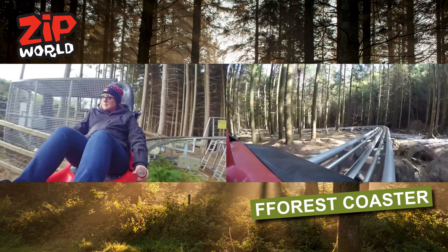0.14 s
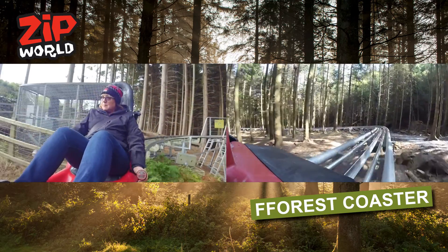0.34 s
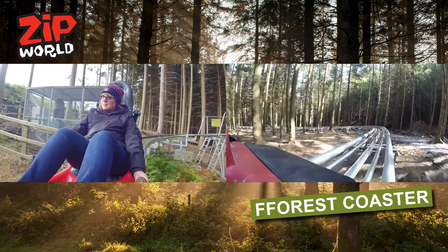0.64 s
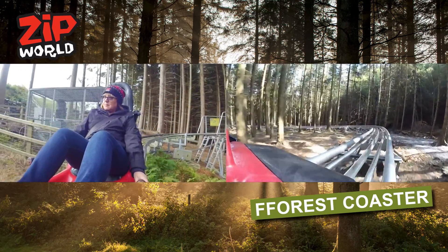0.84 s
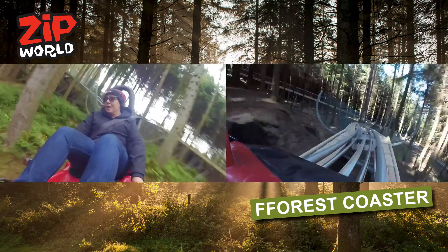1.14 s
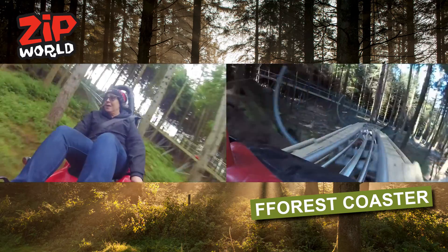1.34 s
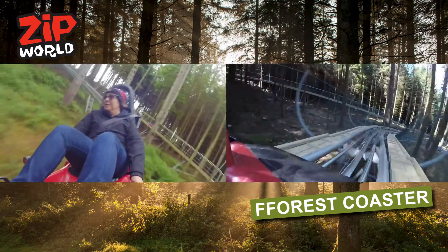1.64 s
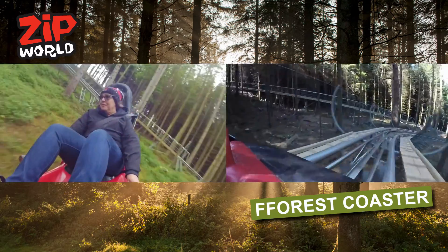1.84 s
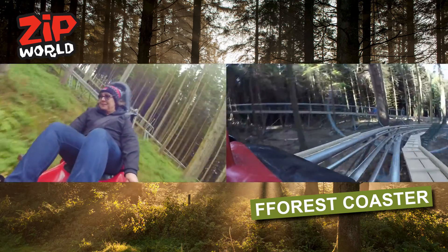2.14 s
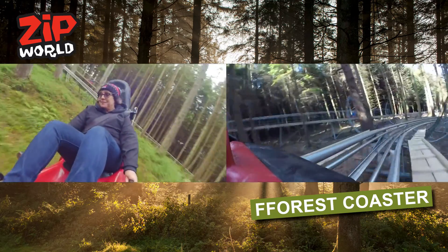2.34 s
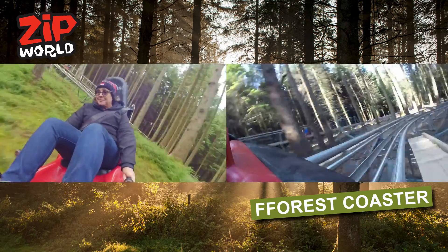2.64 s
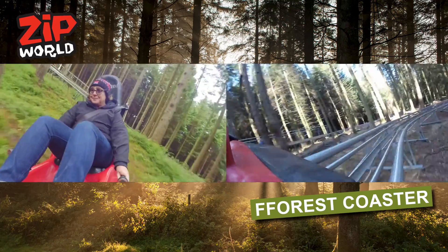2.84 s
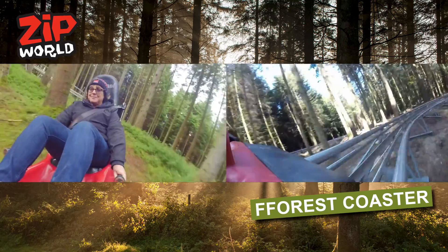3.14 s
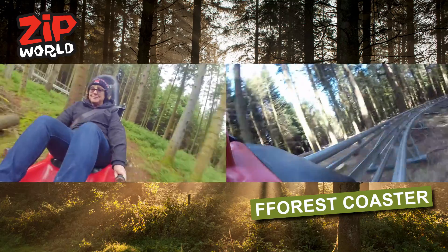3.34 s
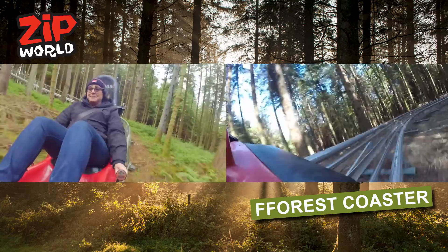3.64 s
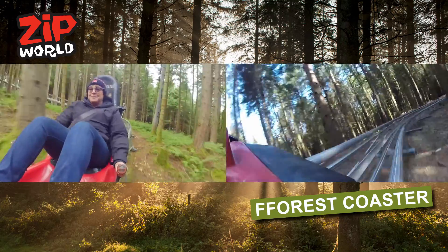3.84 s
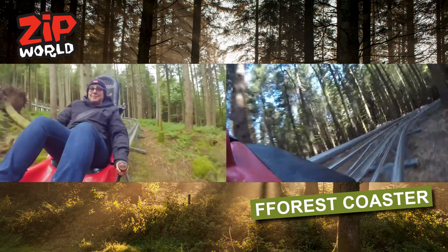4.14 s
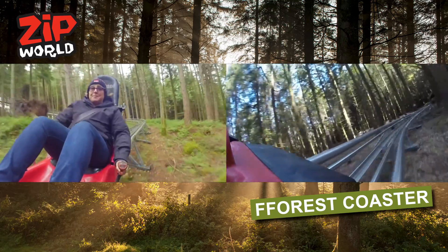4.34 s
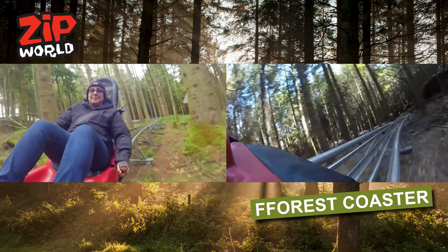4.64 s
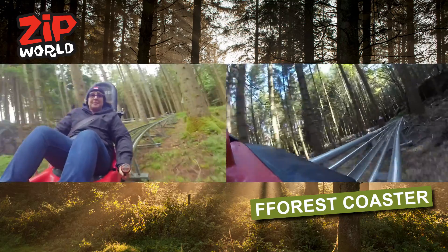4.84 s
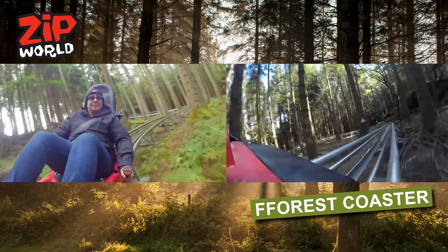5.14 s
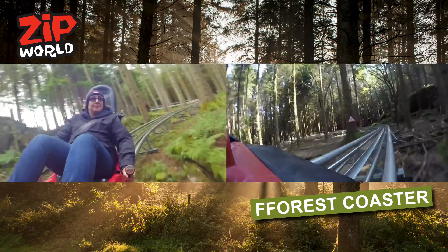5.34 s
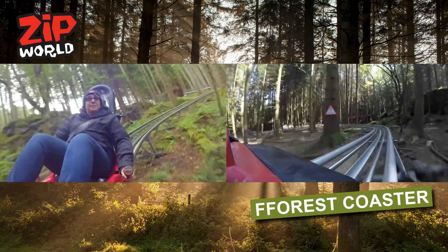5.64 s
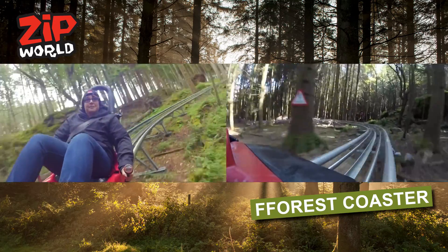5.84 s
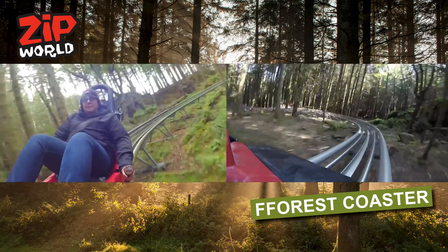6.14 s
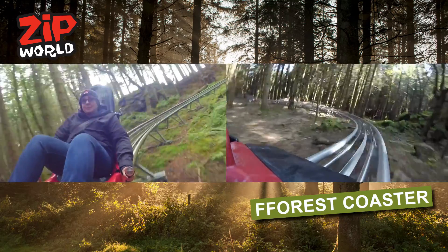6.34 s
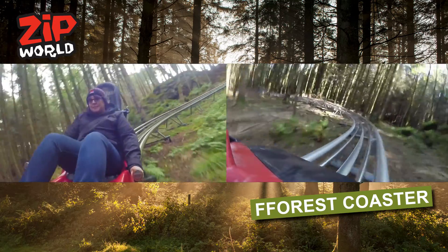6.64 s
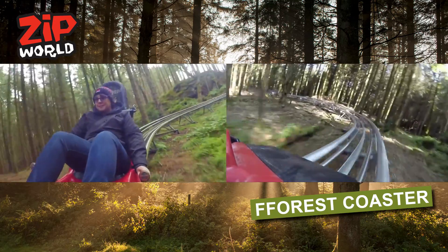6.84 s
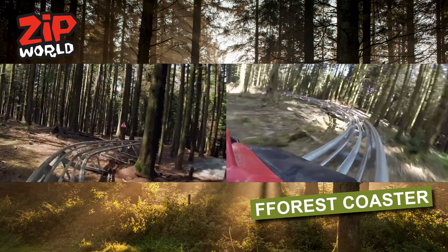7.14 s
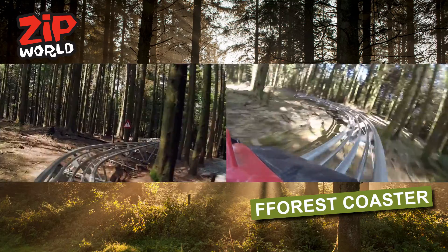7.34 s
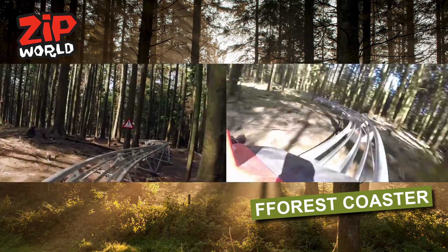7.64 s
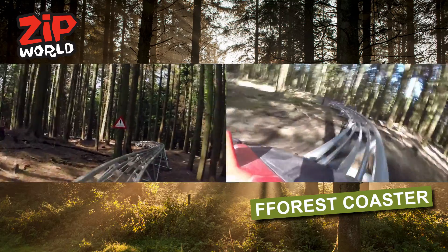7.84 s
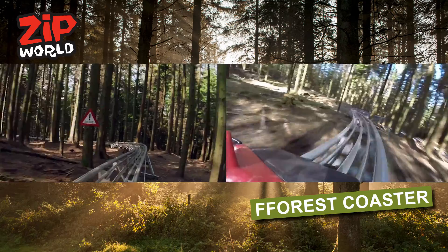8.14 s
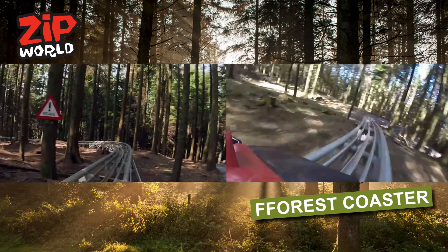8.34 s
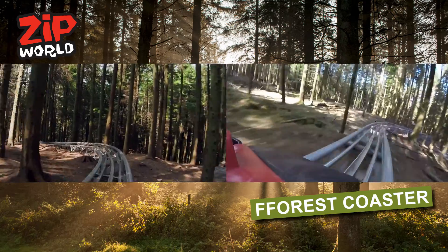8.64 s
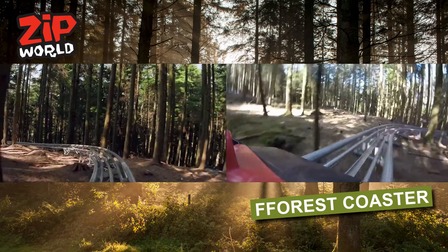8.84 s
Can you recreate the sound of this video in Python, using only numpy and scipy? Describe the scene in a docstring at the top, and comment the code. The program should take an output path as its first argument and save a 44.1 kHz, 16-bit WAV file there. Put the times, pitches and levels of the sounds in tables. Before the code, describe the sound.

A sled creeps softly on steel rails, then abruptly roars downhill with rattling wheels, knocks and clicks, a few bird calls behind.

```python
"""In a forest, with the microphone on the plastic shell of an alpine coaster sled on steel tube rails.
First the sled creeps: filtered noise rumbles softly under thin, fuzzy tones, and one bird note glides by.
Just after 1 s it is abruptly rolling fast: jolted noise bands roar while knocks, clicks and scuffs ring modes.
From 2 s a faint wheel whistle swells, in mid-run small birds call as gliding sines echoed by the trunks,
and after 6 s the hollow shell booms more; the whistle dies away before the end."""
import sys
import numpy as np
from scipy import signal
from scipy.fft import rfft, irfft, next_fast_len
from scipy.io import wavfile

SR = 44100
rng = np.random.default_rng(int(sys.argv[2]) if len(sys.argv) > 2 else 0)


def store_pcm(level_fs):
    """Save levels as 16-bit WAV."""
    pcm = np.round(np.clip(level_fs, -1, 1) * 32767).astype(np.int16)
    wavfile.write(sys.argv[1], SR, np.atleast_2d(pcm).T)


N = 395577
TIME = np.arange(N) / SR
FAST_FROM_S = 1.04


def amp(db):
    """Decibels to gain."""
    return 10 ** (np.asarray(db) / 20)


def evened(x):
    """Scales to an rms of one."""
    return x / np.sqrt(np.mean(x ** 2) + 1e-20)


def peaked(x, db):
    """Scales to a given peak level."""
    return amp(db) * x / (abs(x).max() + 1e-12)


def curves(rows):
    """Each column of a table, joined by straight lines in time."""
    s, *columns = np.transpose(rows)
    return [np.interp(TIME, s, c) for c in columns]


def add(mix, s, sound):
    """Lays a sound into the mix at time s."""
    part = mix[max(round(s * SR), 0):][:len(sound)]
    part += sound[:len(part)]


def noise(spectrum):
    """Noise of rms one, its spectrum joined by straight lines over log frequency."""
    f, db = np.transpose(spectrum)
    size = next_fast_len(N)
    hz = np.fft.rfftfreq(size, 1 / SR)
    gain = amp(np.interp(np.log(hz + 1), np.log(f), db))
    return evened(irfft(rfft(rng.standard_normal(size)) * gain, size)[:N])


def wander(per_s):
    """Smooth chance of rms one that takes a new value per_s times a second."""
    values = rng.standard_normal(8192)
    return evened(np.interp(TIME * per_s, np.arange(len(values)), values))


def softened(x, corner_hz):
    """A yielding contact spreads each tap in time and takes its treble away."""
    r = np.exp(-2 * np.pi * corner_hz / SR)
    return signal.lfilter([1 - r], [1, -r], x)


def ring(modes, size=5000):
    """The answer of a body to one tap: its modes, each dying away."""
    t = np.arange(size) / SR
    body = np.zeros(size)
    for k, (hz, db, t60) in enumerate(modes):
        body += (-1) ** k * amp(db - 60 * t / t60) * np.sin(2 * np.pi * hz * t)
    return body


# each point of contact rings a body differently: largest detuning (share), largest level shift of a mode (dB),
# width of the favoured range (octaves)
POINT_DETUNE, POINT_SPREAD_DB, FAVOURED_OCTAVES = .025, 2.5, .3


def struck(modes, chance, favoured_hz, favoured_db):
    """A body's modes as one contact point excites them: a little shifted, those near one pitch brought out."""
    hz, db, t60 = np.transpose(modes)
    near = np.exp(-(np.log2(hz / favoured_hz) / FAVOURED_OCTAVES) ** 2)
    point_hz = hz * (1 + POINT_DETUNE * chance[0, :len(hz)])
    point_db = db + favoured_db * near + POINT_SPREAD_DB * chance[1, :len(hz)]
    return zip(point_hz, point_db, t60)


def blows(rows, modes, corner_hz, rebound, rise_s, count, touch=1):
    """Each blow is a first touch and a quick, fading chatter; the body's ring builds up, then dies."""
    out = np.zeros(N)
    chances = rng.uniform(-1, 1, (len(rows), 4, max(count, len(modes))))
    for (s, db, length, *favoured), chance in zip(rows, chances):
        when, force = chance[2:, :count]
        body = ring(struck(modes, chance, *favoured))
        body = body * (1 - np.exp(-TIME[:len(body)] / rise_s))
        # further contacts at uneven shares of the chatter length
        share = (np.arange(count) + 1 + when / 2) / (count + 1)
        contacts = np.zeros(int(length * SR) + 2)
        contacts[0] = touch
        contacts[(share * length * SR).astype(int)] += rebound * force * (1 - share / 2)
        add(out, s, peaked(softened(signal.fftconvolve(contacts, body), corner_hz), db))
    return out


def rubs(rows, spectrum, grain_db):
    """Short spells of hard, grainy contact: a quick rise and a slower fall of pressure."""
    out, friction = np.zeros(N), noise(spectrum) * amp(grain_db * wander(500))
    for s, db, length in rows:
        u = np.linspace(0, 1, int(length * SR))
        pressure = np.sin(np.pi * np.sqrt(u)) ** 2
        grain = friction.take(int(s * SR) + np.arange(len(u)), mode="wrap")
        add(out, s, peaked(pressure * grain, db))
    return out


# how hard the wheels bear on the rails: t/s, relative level/dB
RIDE = [(1.26, -20), (2.92, -17), (3.24, -18), (3.88, -23), (4.87, -20.5), (5.34, -22), (5.49, -23.5),
        (5.96, -23), (6.45, -25), (7.22, -21), (8.15, -21), (8.53, -18.5)]
USUAL_EFFORT_DB = -22


def effort_db():
    """How far the wheels' effort lies above the usual."""
    return curves(RIDE)[0] - USUAL_EFFORT_DB


# rough stretches of rail that shake the loose parts: middle t/s, half length/s, extra rattle level/dB
ROUGH_RAIL = [(1.855, 0.12, 7), (4.84, 0.55, 12), (8.503, 0.34, 3.5)]


def rough_db():
    """Extra shaking while the sled crosses rough rail."""
    return sum(db * np.exp(-((TIME - s) / half) ** 2) for s, half, db in ROUGH_RAIL)


# rumble and rattle follow the wheels' effort (dB per dB)
RUMBLE_FOLLOWS, RATTLE_FOLLOWS = 0.44, 0.3


def shaking_db(smooth_rail_db=-41):
    """Level of the loose parts: it follows the wheels' effort and rises on rough rail."""
    return smooth_rail_db + RATTLE_FOLLOWS * effort_db() + rough_db()


# spectra of the rolling layers, low to high: f/Hz, relative level/dB per Hz
RUMBLE = [(12, -9), (40, -0.5), (100, -4), (160, -8.5), (240, -8), (330, -14), (2000, -100)]
BOOM = [(60, -22.5), (145, 1.5), (200, 2), (255, -1), (800, -100)]
ROAR = [(100, -40.5), (220, -4.5), (320, 1), (480, 2), (600, -1), (760, -4), (860, -9.5), (980, -14),
        (1150, -21), (1600, -29.5), (8000, -101)]
HISS = [(500, -23.5), (1200, -18), (1550, -5.5), (1790, 8), (2100, 1.5), (3200, 2.5), (4000, -3.5),
        (5600, -5), (6500, -7.5), (7400, -14.5), (8400, -17.5), (10000, -24), (13000, -29.5),
        (15300, -38.5)]
# the hollow of the shell booms more in the last bend: t/s, level over the rumble noise/dB
BEND = [(1.0, -9), (6.0, -17.5), (6.4, -2), (8.9, -5)]
# hiss of the wheel treads: t/s, relative level/dB
TREAD = [(1.2, -45.5), (2.55, -45), (3.02, -42.5), (3.79, -46.5), (4.91, -44.5), (5.75, -48), (7.5, -44)]
# modes of the sled's chassis, also struck by knocks and clinks: f/Hz, relative level/dB, t60/s
CHASSIS = [(604, 11, 0.028), (985.5, 0.5, 0.053), (1086.4, -5, 0.05), (1303, -0.5, 0.018),
           (1443, -10.5, 0.041), (1785, -2.5, 0.022), (2022, -18, 0.031), (2205, -6, 0.017),
           (2690, -12, 0.024), (3130, -19.5, 0.011), (3624, -17, 0.017), (1846, -24, 0.35)]
# on rough rail the wheels roar more and the taps crowd together (dB per dB of extra rattle)
ROUGH_ROARS, ROUGH_CROWDS = 0.11, 0.2


def rolling(rumble_db=-17.0, roar_db=-23.5, hiss_db=1.3,
            boom_jolt_db=2, roar_jolt_db=1.5, hiss_jolt_db=1.5, rattle_jolt_db=2,
            loose_db=6.5, taps_per_s=450, tap_spread_db=3.5, tap_hz=1500):
    """Rail roughness jolts the wheels: boom, roar, loose parts and hiss swell together over the rumble."""
    effort, rough, jolt = effort_db(), rough_db(), wander(45)
    boom = amp(curves(BEND)[0]) * evened(amp(boom_jolt_db * jolt) * noise(BOOM))
    rumble = amp(rumble_db + RUMBLE_FOLLOWS * effort) * (noise(RUMBLE) + boom)
    roar_gain = amp(roar_db + effort + ROUGH_ROARS * rough)
    roar = roar_gain * evened(amp(roar_jolt_db * jolt) * noise(ROAR))
    hiss = amp(hiss_db + curves(TREAD)[0] + hiss_jolt_db * jolt) * noise(HISS)
    # loose parts tap the chassis in short flurries of uneven size
    crowding = amp(ROUGH_CROWDS * rough)
    hits = (rng.random(N) < crowding * taps_per_s / SR) * rng.choice([-1, 1], N)
    taps = hits * amp(tap_spread_db * np.minimum(rng.exponential(1, N), 3))
    flurries = amp(rattle_jolt_db * jolt + loose_db * np.tanh(2 * wander(70))) / np.sqrt(crowding)
    rattle = evened(signal.oaconvolve(taps * flurries, softened(ring(CHASSIS), tap_hz))[:N])
    return rumble + roar + hiss + amp(shaking_db()) * rattle


def buffets(per_s=22, spread_db=6.5, level_db=-25.5, width_s=0.0019, size=1200):
    """Short, dull shoves of air and shell make the rumble lumpy."""
    hits = (rng.random(N) < per_s / SR) * rng.choice([-1, 1], N)
    shoves = hits * amp(spread_db * np.minimum(rng.exponential(1, N), 2))
    u = (np.arange(size) - size / 2) / SR / width_s
    pulse = (1 - u ** 2) * np.exp(-u ** 2 / 2)
    lumps = evened(signal.oaconvolve(shoves, pulse, "same"))
    return amp(level_db + RUMBLE_FOLLOWS * effort_db()) * lumps


# modes of the plastic shell under the microphone: f/Hz, relative level/dB, t60/s
SHELL = [(227, 3, 0.072), (365, -2.5, 0.11), (436, -6.5, 0.023), (576, 2.5, 0.035), (733, -0.5, 0.037),
         (779, 3, 0.044)]
# wheels thudding over uneven rail: t/s, peak level/dB, chatter length/s, favoured f/Hz
THUDS = [(0.115, -23.5, 0.065, 453), (1.396, -9, .015, 400), (3.09, -6.5, 0.024, 550),
         (3.155, -3.5, .025, 744), (3.466, -8, 0.023, 685), (3.643, -6.5, 0.017, 400),
         (4.156, -4.5, .012, 525), (4.172, -4, .02, 260), (4.724, -7, 0.0115, 348),
         (5.281, -3.5, 0.008, 352), (5.842, -8, .022, 560), (5.926, -8.5, .03, 600),
         (5.959, -5, 0.021, 630)]


def thuds(soft_hz=1200, favoured_db=6):
    """A wheel judders over a bump and booms through the shell."""
    rows = [(*row, favoured_db) for row in THUDS]
    return blows(rows, SHELL, soft_hz, rebound=0.56, rise_s=0.00072, count=9)


# spectrum of scuffing, also the grit of knocks and scrape of clicks: f/Hz, relative level/dB per Hz
SCUFF = [(1500, 2), (3200, 1.5), (4400, -3), (5100, -2), (6300, -2), (7100, -10), (9500, -23), (11500, -25),
         (15300, -36)]
# chassis knocks: t/s, peak level/dB, chatter length/s, favoured f/Hz, its boost/dB
KNOCKS = [(0.111, -33, .02, 1900, 2), (1.31, -1.5, 0.008, 1050, 4.5), (1.322, -6.5, .007, 1030, 15),
          (2.021, -5, .016, 1170, 13), (2.427, -15, .022, 1450, 6), (2.685, -6.5, 0.01, 2800, 9),
          (2.742, -10.5, 0.012, 1400, 5), (3.477, -12, 0.021, 950, 4), (3.651, -11, 0.0094, 2020, 9),
          (4.1615, -14, .012, 2300, 5.5), (4.701, -11.5, .03, 1200, 0), (4.788, -18, .015, 1130, 4),
          (4.858, -13, 0.035, 1350, 8), (5.017, -11.5, .025, 1900, 3), (5.2945, -5, 0.013, 1560, 6),
          (5.377, -12.5, 0.0067, 2200, 6.5), (5.427, -9, 0.00397, 1610, 2), (6.573, -2, 0.0081, 2100, 10),
          (6.582, -5.5, .014, 1150, 3), (8.372, -9, .015, 1500, 10), (8.954, -8.5, .015, 1400, 2)]
# loose parts go on chattering after a knock: level relative to the knock (dB), length (s)
AFTER_DB, AFTER_S = -20.5, 0.073


def knocks(hard_hz=2900, grit_db=-22, grit_lead_s=0.0024, grit_s=0.019):
    """The chassis slams against its stops with a gritty contact, rings, and leaves loose parts chattering."""
    chatter = [(s + length, db + AFTER_DB, AFTER_S, *colour) for s, db, length, *colour in KNOCKS]
    grit_rows = [(s - grit_lead_s, db + grit_db, grit_s) for s, db, *_ in KNOCKS]
    grit = rubs(grit_rows, SCUFF, grain_db=6.5)
    return grit + blows(KNOCKS + chatter, CHASSIS, hard_hz, rebound=0.6, rise_s=0.0005, count=12, touch=0.62)


# light steely clinks of the wheels over flaws in the rail: t/s, peak level/dB
CLINKS = [(1.804, -17), (1.983, -22), (2.535, -19), (2.776, -13.5), (3.17, -17.5), (3.396, -17),
          (3.725, -18), (3.973, -19), (4.986, -17), (5.07, -16), (5.13, -23), (5.191, -11.5),
          (6.032, -18.5), (7.431, -15), (8.038, -20)]
# fainter clinks by chance: rate on smooth rail (per s), highest peak over the rattle, spread below it (dB)
FAINT_PER_S, FAINT_OVER_DB, FAINT_SPREAD_DB = 8, 15, 4.5


def clinks(hard_hz=4200, chatter_s=.011, ring_hz=1800, ring_db=2.5):
    """Wheels tick over small flaws and ring the steely chassis; on rough rail the ticks crowd into a crackle."""
    shaking, (chance, size) = shaking_db(), rng.random((2, N))
    rate = FAINT_PER_S * amp(rough_db())
    at = np.flatnonzero((chance < rate / SR) & (TIME > FAST_FROM_S))
    faint = [(TIME[k], shaking[k] + FAINT_OVER_DB - FAINT_SPREAD_DB * size[k]) for k in at]
    rows = [(s, db, chatter_s, ring_hz, ring_db) for s, db in CLINKS + faint]
    return blows(rows, CHASSIS, hard_hz, rebound=1.0, rise_s=0.00064, count=9)


# modes of the plastic housing: f/Hz, relative level/dB, t60/s
HOUSING = [(970, 9.5, 0.0053), (1180, 1.5, 0.013), (1820, -2, 0.0074), (2815, -7.5, 0.01), (3720, 0, 0.009),
           (4440, -12.5, 0.0063), (4970, -1.5, 0.005), (5720, -16, 0.008), (9250, -26, 0.008)]
# housing clicks: t/s, peak level/dB, chatter length/s, favoured f/Hz, its boost/dB
CLICKS = [(3.256, -20, 0.0021, 5930, 12), (5.374, -19, .0027, 6500, 16), (6.7119, -1, 0.0036, 4700, 5),
          (7.3035, -12.5, 0.003, 5650, 10), (7.8978, -4.5, 0.0029, 4400, 7)]


def housing_clicks(hard_hz=8000, scrape_db=-15, scrape_s=0.0099, lead_s=.0025, push_db=-7, push_s=0.016):
    """The housing slips with a tiny scrape, clatters back on its mount and gives the shell a low push."""
    snaps = blows(CLICKS, HOUSING, hard_hz, rebound=.75, rise_s=.0009, count=12)
    scrape_rows = [(s - lead_s, db + scrape_db, scrape_s) for s, db, *_ in CLICKS]
    push_rows = [(s, db + push_db, push_s) for s, db, *_ in CLICKS]
    return snaps + rubs(scrape_rows, SCUFF, grain_db=11.5) + rubs(push_rows, ROAR, grain_db=-3.0)


# scuffs of the guides on the rail: t/s, peak level/dB, length/s
SCUFFS = [(2.42, -29, 0.036), (3.355, -30, 0.046), (3.458, -22.5, 0.087), (4.162, -28, 0.044),
          (4.648, -22, 0.037), (4.785, -22, 0.069), (4.927, -18.5, 0.04), (5.075, -25.5, 0.039),
          (5.224, -20.5, 0.03), (5.55, -27.5, 0.037), (5.69, -29.5, 0.1)]


def scuffs():
    """The guides rub the rail in short bursts of grainy noise."""
    return rubs(SCUFFS, SCUFF, grain_db=1.0)


# brief squeals of a wheel flange: t/s, peak level/dB, length/s
SQUEALS = [(.005, -46, 0.44), (4.927, -14, 0.034)]
# their spectrum: f/Hz, relative level/dB per Hz
SQUEAL = [(3900, -43), (4850, 3), (5500, -5), (6200, 2), (7100, -19), (12000, -40)]


def squeals():
    """A wheel flange rubs the rail in a high, grainy band of noise."""
    return rubs(SQUEALS, SQUEAL, grain_db=6.0)


# two bright, dry ticks: t/s, peak level/dB
TICKS = [(1.041, -23), (2.057, -16)]


def ticks(decay_s=0.0004, corner_hz=3500, size=200):
    """Tiny snaps of fast-fading noise with no ring at all."""
    out = np.zeros(N)
    for s, db in TICKS:
        snap = rng.standard_normal(size) * np.exp(-TIME[:size] / decay_s)
        add(out, s, peaked(softened(snap, corner_hz), db))
    return out


# rumble of the creeping sled: f/Hz, relative level/dB per Hz
CREEP = [(20, -1.5), (35, 8), (52, 0.5), (90, -4), (280, -12.5), (540, -13), (650, -18.5), (770, -14.5),
         (1150, -31), (1620, -38), (1750, -34), (1950, -37.5), (3900, -46.5), (5900, -43.5), (6500, -49),
         (8500, -55), (15000, -65)]
# thin fuzzy tones of the creeping sled: centre f/Hz, rms level/dB
CREEP_TONES = [(1765, -68), (4200, -72.5), (5800, -71), (6080, -72)]


def creeping(rumble_db=-32.5, waver_db=2.5, jitter_hz=60, jitter_per_s=350):
    """The slow sled: a soft noise rumble with a thin whine, fuzzy from its jittering pitch."""
    whine = np.zeros(N)
    for hz, db in CREEP_TONES:
        level = amp(db + waver_db * wander(19.4))
        phase = 2 * np.pi * np.cumsum(hz + jitter_hz * wander(jitter_per_s)) / SR
        whine += level * evened(np.sin(phase))
    return amp(rumble_db) * noise(CREEP) + whine


# pitch of a singing wheel, before it swings and jitters: t/s, f/Hz
SING = [(3.7, 4280), (4.3, 4210), (5.3, 4220), (6.45, 4340), (6.8, 4600)]
# the singing swells, holds and dies away
SING_FROM_S, SING_TO_S, SING_ATTACK_S, SING_RELEASE_S, SING_DB = 2, 7.7, 1.4, 0.93, -55


def singing_wheel(turns_per_s=5.2, swing_hz=30, jitter_hz=50, throb_db=2.5, falter_db=2):
    """A thin, faltering whistle that swells and bends with each turn of the wheel."""
    rise, fall = (TIME - SING_FROM_S) / SING_ATTACK_S, (SING_TO_S - TIME) / SING_RELEASE_S
    swell = np.clip(np.minimum(rise, fall), 0, 1)
    turn = np.sin(2 * np.pi * turns_per_s * TIME)
    hz = curves(SING)[0] + swing_hz * turn + jitter_hz * wander(360)
    level = amp(SING_DB + throb_db * turn + falter_db * wander(50))
    return swell * level * np.sin(2 * np.pi * np.cumsum(hz) / SR)


# single bird notes, before trill and flutter: t/s, length/s, start f/Hz, middle f/Hz, end f/Hz, level/dB
CHIRPS = [(.75, .14, 7800, 7400, 7250, -73), (4.395, .04, 6700, 5700, 4900, -48),
          (6.238, .07, 6000, 7100, 6300, -39), (6.33, .042, 3850, 4200, 4500, -43)]
# a see-saw song repeats one low and one high note: first t/s, then columns as for the single notes
SONG = [(4.588, .057, 5900, 5000, 4300, -46), (4.71, .09, 8950, 8050, 7300, -55)]
SONG_PERIOD_S, FOREST_T60_S = .243, .55


def birds(trill_hz=110, flutter_db=3, forest_db=-5, count=4):
    """Gliding whistles in the trees, scattered back by the trunks as a fading tail."""
    out, trill, flutter = np.zeros(N), trill_hz * wander(500), amp(flutter_db * wander(180))
    song = [(s + k * SONG_PERIOD_S, *note) for k in range(count) for s, *note in SONG]
    for s, length, start, middle, end, db in song + CHIRPS:
        u = np.linspace(0, 1, int(length * SR))
        glide = np.polyval(np.polyfit([0, .5, 1], [start, middle, end], 2), u)
        hz = glide + trill[int(s * SR):][:len(u)]
        whistle = np.sin(2 * np.pi * np.cumsum(hz) / SR)
        add(out, s, amp(db) * signal.windows.tukey(len(u), .25) * whistle)
    out = out * flutter
    t = TIME[:SR]
    # the first trunks answer after 12 ms
    trunks = rng.standard_normal(SR) * (t > .012) * np.exp(-np.log(1000) * t / FOREST_T60_S)
    return out + amp(forest_db) * signal.oaconvolve(out, trunks / np.linalg.norm(trunks))[:N]


def scene():
    """The slow start gives way to the fast run; hits and birds lie over both."""
    fast = np.clip((TIME - FAST_FROM_S) / 0.0012, 0, 1)
    sled = fast * (rolling() + buffets()) + (1 - fast) * creeping()
    events = thuds() + knocks() + clinks() + housing_clicks() + scuffs() + squeals() + ticks()
    return (sled + events + singing_wheel() + birds())[None]


def record(dry, knee=.75, headroom=.2, edge_hz=15400):
    """The microphone chain rounds off the loudest peaks, then limits the band with a low-pass."""
    over = np.maximum(abs(dry) - knee, 0)
    rounded = np.clip(dry, -knee, knee) + np.sign(dry) * headroom * np.tanh(over / headroom)
    lowpass = signal.firwin(511, edge_hz, window=("kaiser", 9), fs=SR)
    return signal.oaconvolve(rounded, lowpass[None], "same")


dry = scene()
out = record(dry)
store_pcm(out)
```